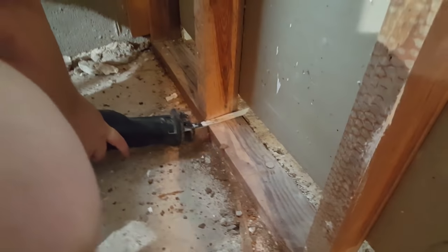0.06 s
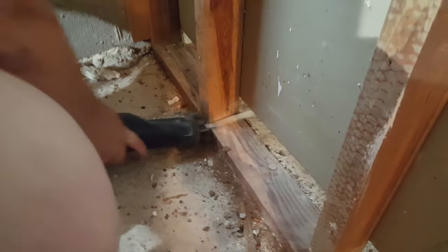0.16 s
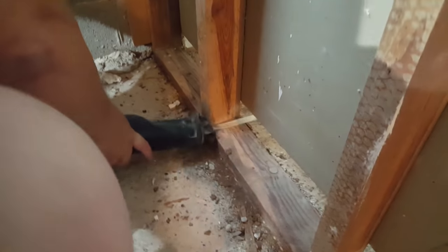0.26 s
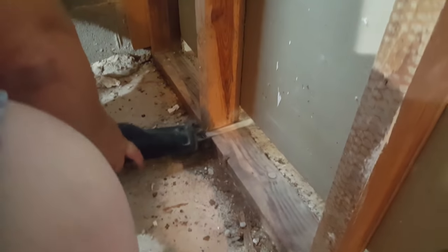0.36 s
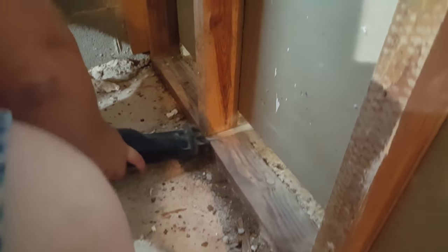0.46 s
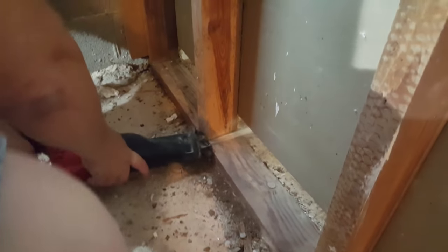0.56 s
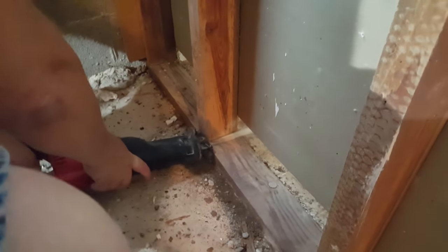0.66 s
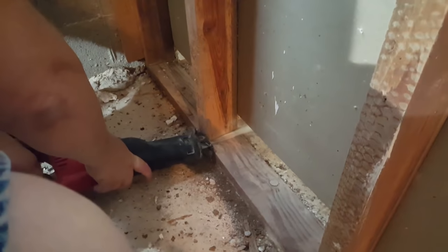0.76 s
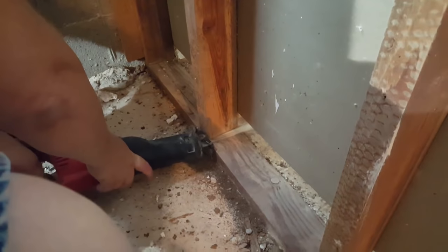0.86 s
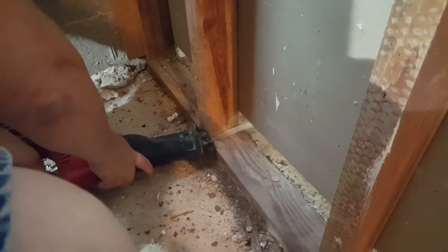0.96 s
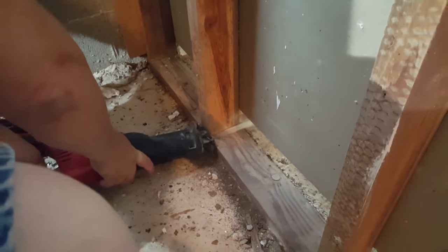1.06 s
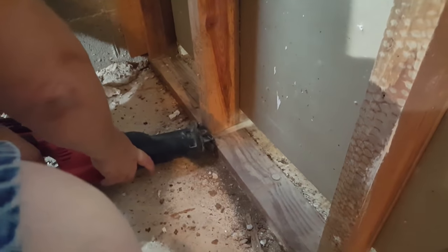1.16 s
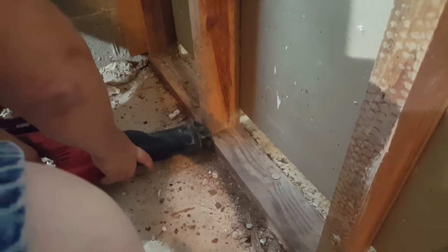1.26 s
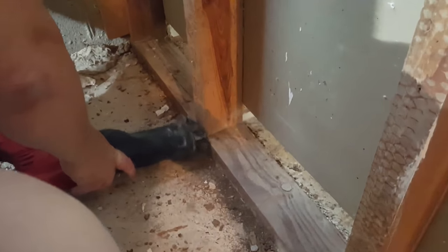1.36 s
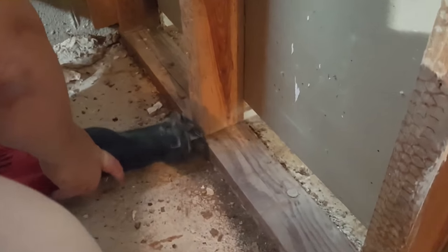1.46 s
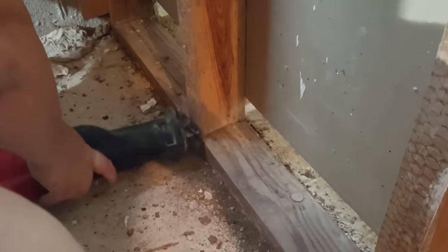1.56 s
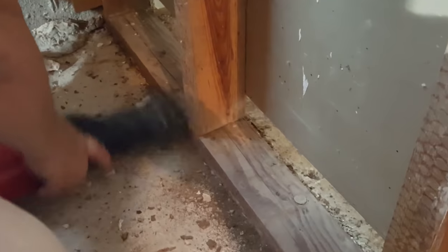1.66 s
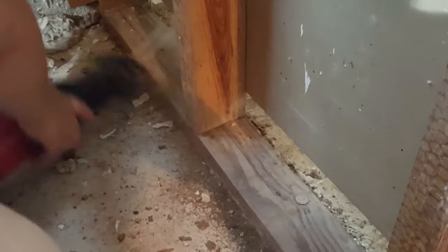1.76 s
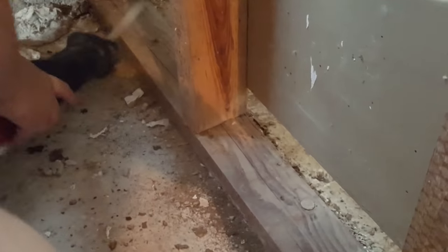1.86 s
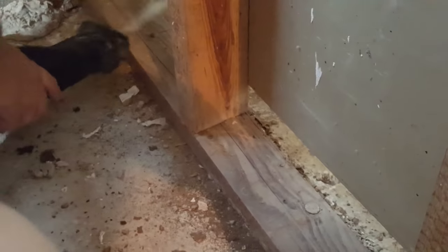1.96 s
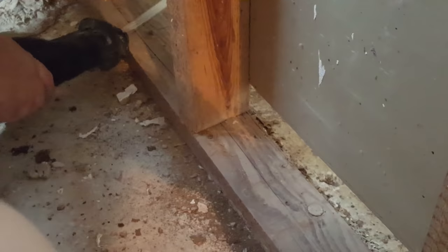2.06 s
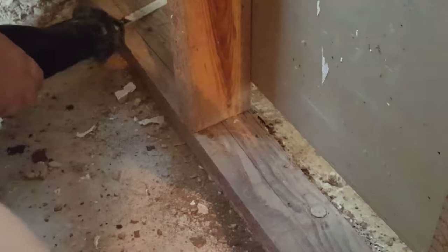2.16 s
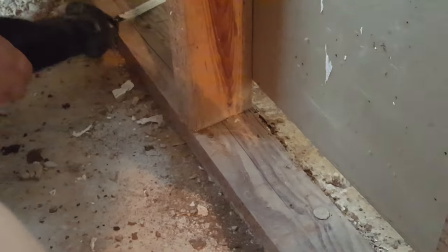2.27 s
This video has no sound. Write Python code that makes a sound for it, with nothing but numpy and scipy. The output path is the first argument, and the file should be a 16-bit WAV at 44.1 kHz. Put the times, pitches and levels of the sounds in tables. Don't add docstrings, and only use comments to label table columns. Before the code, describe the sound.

A reciprocating saw, close up in a bare reverberant room. Low handling rumble and hiss, a plastic trigger click near 0.08 s, then a quick motor run-up and brief squeal at 0.2-0.3 s. Loud gritty rasping on steel hammers about 45 strokes per second, with frame shudder and knocks, rougher thuds around 1.3-1.6 s. A sharp crack at 1.84, free whirr from 1.9, stopping about 2.15.

```python
import sys
import numpy as np
from scipy import signal
from scipy.fft import rfft, irfft
from scipy.io import wavfile

SR = 44100
rng = np.random.default_rng(int(sys.argv[2]) if len(sys.argv) > 2 else 0)


def transcribe(signal):
    frames = np.atleast_2d(signal).T
    limited = np.clip(frames, -1, 1)
    pcm = np.round(limited * 32767).astype(np.int16)
    wavfile.write(sys.argv[1], SR, pcm)


def volts_from_decibels(level):
    exponent = np.asarray(level, float) / 20
    return 10 ** exponent


N = 103635
FFT_SIZE = 2 ** 17
T = np.arange(N) / SR
HZ = np.fft.rfftfreq(FFT_SIZE, 1 / SR) + 1

# (time [s], rate [strokes/s])
STROKE_RATE = [(0.2, 30.6), (0.24, 37.2), (0.28, 43.2), (0.3, 47.0), (0.4, 47.6), (0.48, 46.7),
               (1.11, 46.3), (1.25, 46.6), (1.34, 46.2), (1.5, 44.2), (1.82, 44.2), (1.9, 44.6),
               (2.03, 44.6), (2.35, 46.1)]
# (time [s], rasp level [dB], frame shake level [dB], stroke depth [0-1])
CUT = [(0.25, -59, -68, 1), (0.29, -15.5, -12, 0), (0.36, -21.5, -20, 0.5), (0.45, -14.5, -18.5, 0.54),
       (0.6, -17, -17.5, 0.3), (0.75, -15.5, -19.5, 0.05), (1.05, -18, -22, 0.84), (1.2, -13, -23.5, 0.2),
       (1.31, -14.5, -21, 0.34), (1.55, -14, -24.5, 0.42), (1.62, -18, -20, 0.1),
       (1.76, -24.5, -24.5, 0.04), (1.81, -23, -28, 0.1), (1.95, -82, -66, 1)]
# (frequency [Hz], density [dB/Hz])
RASP_COLOUR = [(120, -24.5), (200, -7.5), (311, -16), (635, -4.5), (696, -3.5), (1650, -3), (2750, -16.5),
               (4120, -12.5), (16000, -39)]
# (frequency [Hz], width [Hz], lift [dB])
WOOD_MODES = [(645, 61, 5.5), (1000, 13, 3.5), (1347, 91, 5.5), (1654, 65, 5.5), (2300, 390, 5.5),
              (3840, 250, -0.5), (5600, 730, -13)]
# (frequency [Hz], density [dB/Hz])
CRACK_COLOUR = [(150, -42), (1000, 8), (4300, 8), (8000, 2.5), (16000, -12)]
# (time [s], peak level [dB])
KNOCKS = [(0.2881, -5.5), (0.3353, -12), (0.3554, -11.5), (0.3886, -26), (0.4022, -6.5), (0.449, -18),
          (0.4713, -28), (0.515, -5), (0.5373, -19), (0.557, -8), (0.5796, -21), (0.641, -16.5),
          (0.6844, -7.5), (0.7118, -15), (0.751, -23), (0.814, -14), (0.8366, -15), (0.856, -28),
          (0.8775, -14), (0.9199, -34), (0.9847, -29), (1.007, -12), (1.0266, -27), (1.0493, -15),
          (1.07, -13), (1.2087, -21), (1.317, -9.5), (1.3294, -23), (1.349, -6.5), (1.4496, -11),
          (1.503, -24), (1.541, -14), (1.584, -9.5), (1.6512, -13.5), (1.7874, -20)]
# (time [s], peak level [dB])
SNAGS = [
    (.427, -13),
    (.493, -19),
    (1.5533, -19),
    (1.5964, -14),
    (1.8385, -5),
    (1.8564, -21),
    (1.913, -14),
    (2.0936, -16),
]
# (time [s], level [dB], pitch [Hz])
BUCKS = [(0.289, -8.5, 286), (0.292, -9.5, 165.4), (0.326, -9.5, 160), (.355, -17, 153), (0.396, -13, 174),
         (.715, -10.5, 682), (0.357, -5.5, 750), (0.43, -4.5, 1322), (0.47, -12.5, 374), (1.315, -7, 1260),
         (1.33, -6.5, 1416), (1.374, -7, 1990), (1.463, -12.5, 2080), (1.548, -17, 2210), (1.838, -16, 960),
         (1.369, -7.5, 993), (1.414, -10, 1000), (1.46, -9.5, 907), (1.504, -9, 1058), (1.548, -9.5, 800),
         (1.596, -11, 1302), (1.695, -16, 190), (1.755, -19, 184)]
# (time [s], level [dB])
BLADE_RING = [(1.36, -60), (1.42, -27), (1.58, -25), (1.63, -60)]
# (time [s], locked share [0-1])
LOCK = [(0.3, 0.29), (0.7, 0.91), (1.2, 0.73), (1.4, 0.45), (1.7, 0.27)]
# (multiple of stroke rate, level [dB], strongest moment [s], span [s])
SHAKE_OVERTONES = [(1, -4.5, 1.13, 0.55), (2, -2.5, 1.08, 0.33), (3, -5.5, 0.98, 0.21), (4, 1, 1.084, 0.31),
                   (4, 2, 1.62, 0.065), (5, 0.5, 0.815, 0.12), (6, 0, 1.085, 0.29), (8, -4, .8, 0.14),
                   (9, 2.5, 1.084, 0.15), (10, -0.5, 0.99, 0.24), (11, -0.5, 0.93, .08),
                   (14, 4.5, 1.16, 0.21), (16, -0.5, 1.1, 0.097), (18, -0.5, 1.22, 0.088)]
# (frequency [Hz], density [dB/Hz])
FRAME_COLOUR = [(15, -31), (25, -38), (81, -13), (125, -5), (170, -4), (230, -9.5), (348, -9), (485, -21.5),
                (600, -11), (780, -44), (1320, -120)]
# (time [s], level [dB])
MOTOR_LEVEL = [(0.15, -78), (0.19, -45), (0.23, -30), (0.26, -17.5), (0.3, -18), (1.8, -22), (2.09, -22),
               (2.13, -32), (2.16, -45), (2.2, -58)]
# (frequency [Hz], density [dB/Hz])
WHIRR_COLOUR = [(59, -68), (100, -48), (266, -10), (315, -11.5), (350, -6), (930, -2.5), (2930, -13),
                (4400, -12), (5200, -14.5), (8800, -20.5), (16000, -27)]
# (frequency [Hz], width [Hz], lift [dB])
CASE_MODES = [(617, 27, 3.5), (954, 39, 4), (1850, 260, 8), (3260, 300, 3), (4066, 430, 3), (5900, 230, 2)]
# (time [s], level [dB])
WHISTLE = [(.12, -79), (.135, -55), (.17, -56), (.195, -51), (.23, -44), (.245, -70)]
# (time [s], level [dB])
SQUEAL = [(.2, -59), (.25, -24), (.29, -27), (.31, -60)]
# (time [s], peak level [dB], fall [dB/s])
TICKS = [
    (.0815, -25, 700),
    (.092, -35, 800),
    (.112, -42, 1400),
    (.188, -37, 900),
]
# (frequency [Hz], density [dB/Hz])
TICK_COLOUR = [(250, -23), (950, 0), (3500, -19), (6000, -11), (9400, -32), (12000, -22), (16000, -46)]
# (frequency [Hz], level [dB], T60 [s])
TRIGGER_MODES = [(500, -8, .1), (657, -8, .1), (921, -1, .12), (1222, -2, .05), (1346, -12, .12),
                 (1733, -1, .06), (1965, -12, .12)]
# (time [s], level [dB])
GRIT = [
    (.001, -46),
    (.147, -36),
    (2.203, -49),
    (2.243, -49),
    (2.288, -43),
]
# (time [s], level [dB])
SHUFFLE = [(0, -33), (.06, -34), (.13, -31.5), (.18, -35.5), (.4, -25), (2.1, -37), (2.35, -48)]
# (frequency [Hz], density [dB/Hz])
RUMBLE_COLOUR = [(18, -53), (30, -18), (125, 0.5), (240, -5.5), (276, -11), (462, -19), (2110, -47),
                 (8000, -80), (10400, -101), (17600, -120)]
# (frequency [Hz], density [dB/Hz])
HISS_COLOUR = [(180, -44), (300, -2), (1540, -9), (2500, -17.5), (8500, -32), (9500, -38), (15500, -33)]
# (frequency [Hz], shared power [0-1])
LIKENESS = [(60, 0.96), (180, 1), (350, 0.85), (700, 0.84), (1400, 0.15), (12000, 0.04)]
# (frequency [Hz], left over right [dB])
LEAN = [(60, -1), (240, -1), (950, 1.0), (3770, -0.5), (15000, -2.6)]
# (frequency [Hz], level [dB])
MICROPHONE = [(25, -14), (45, 0), (7000, 0), (9000, -1.5), (10100, -10.5), (11500, -3.5), (15500, -4)]


def rms_one(x):
    return x / np.sqrt(np.mean(x ** 2) + 1e-20)


def in_time(rows):
    s, *columns = np.transpose(rows)
    return [np.interp(T, s, column) for column in columns]


def at_hz(points):
    hz, values = np.transpose(points)
    return np.interp(np.log(HZ), np.log(hz), values)


def drift(rate_hz):
    r = np.exp(-2 * np.pi * rate_hz / SR)
    settle = 9000
    wander = signal.lfilter([1], [1, -2 * r, r * r], rng.standard_normal(N + settle))
    return rms_one(wander[settle:])


def body(force, spectrum, peaks=()):
    db = at_hz(spectrum)
    for hz, wide, lift_db in peaks:
        db = db + lift_db / (1 + (2 * (HZ - hz) / wide) ** 2)
    cepstrum = irfft(db * np.log(10) / 20)
    cepstrum[1:len(HZ) - 1] *= 2
    cepstrum[len(HZ):] = 0
    response = rfft(cepstrum)
    colour = rms_one(np.exp(response.real)) * np.exp(1j * response.imag)
    alike = at_hz(LIKENESS)
    lean = volts_from_decibels(at_hz(LEAN) / 2)
    noise = rfft(force * rng.standard_normal((2, N)), FFT_SIZE)
    mid, side = noise * colour * np.sqrt([(1 + alike) / 2, (1 - alike) / 2])
    return irfft([(mid + side) * lean, (mid - side) / lean])[:, :N]


def hits(rows, fall_db_per_s):
    force = np.zeros(N)
    for (s, db), fall in zip(rows, np.broadcast_to(fall_db_per_s, len(rows))):
        force += volts_from_decibels(np.where(T >= s, db - fall * (T - s), -200))
    return force


def strokes():
    turns = np.cumsum(in_time(STROKE_RATE)[0]) / SR
    knock_s = 0.985
    return turns - turns[int(knock_s * SR)]


def rasp(turns):
    db, _, depth = in_time(CUT)
    unevenness = np.clip(rng.normal(0, 1, 200), -1.5, 1.5)
    each_stroke = unevenness[np.floor(turns).astype(int) + 60]
    stroke_knock = depth * volts_from_decibels(1.2 * each_stroke) * np.exp(-(turns % 1) / 0.17)
    grain = volts_from_decibels(2.2 * drift(260) + 2.5 * drift(1200) + drift(30))

    lift_s, lift_share = 0.010, 0.85
    bite = np.ones(N)
    for s, _, hz in BUCKS:
        if hz > 600:
            bite *= 1 - lift_share * np.exp(-((T - s + lift_s) / lift_s) ** 2)

    blows = hits(KNOCKS, 1500)
    tooth_force = volts_from_decibels(db) * bite * rms_one(grain * (1 + 1.83 * stroke_knock))
    scrape = body(tooth_force + 0.59 * blows, RASP_COLOUR, WOOD_MODES)
    crack_force = volts_from_decibels(-5) * hits(SNAGS, 1300) + volts_from_decibels(-8) * blows + volts_from_decibels(db + 1.5) * stroke_knock
    return scrape + body(crack_force, CRACK_COLOUR, [(5650, 990, -7)])


def bucks():
    decay_cycles, hold_s, roughness, sag_per_s = 3.34, 0.025, 0.7, 7
    t = np.arange(SR // 8) / SR
    out = np.zeros((2, N))
    for s, db, hz in BUCKS:
        noise = rng.standard_normal((2, 2, len(t)))
        noise = noise + noise[:, ::-1] * np.clip(450 / hz, 0, 1)
        r = volts_from_decibels(-60 * hz / decay_cycles / SR)
        rough = (noise[0] + 1j * noise[1]) / np.sqrt(1 - r)
        push = np.exp(-(t / hold_s) ** 4) * (1 + roughness * rough)
        swing = signal.lfilter([1], [1, -2 * r, r * r], push)
        bend = 1 + min(hz / 1000, 1) * (0.1 - sag_per_s * t / 2)
        start_cycles = rng.random((2, 1)) * hz / 2000
        ring = (swing * np.exp(2j * np.pi * (hz * t * bend + start_cycles))).imag
        start = int(s * SR)
        out[:, start:start + len(t)] += volts_from_decibels(db) * ring / np.abs(ring).max()
    return out


def blade_ring():
    level = volts_from_decibels(in_time(BLADE_RING)[0] + 2.5 * drift(15)) * (T > 1.3) * (T < 1.7)
    return level * np.sin(2 * np.pi * 740 * T + 0.5 * drift(6))


def shake(turns):
    lock = in_time(LOCK)[0]
    swell_db = 14
    overtones = np.zeros(N)
    for k, db, s, span in SHAKE_OVERTONES:
        level = volts_from_decibels(db + swell_db * np.exp(-((T - s) / span) ** 2) + drift(1.2))
        phase = 2 * np.pi * k * (turns + 0.1315) + 0.25 * k * k + 0.41 * drift(2.1)
        overtones += level * np.cos(phase)
    firm = np.sqrt(lock) * rms_one(overtones)
    loose = np.sqrt(1 - lock) * body(volts_from_decibels(1.5 * drift(16.7)), FRAME_COLOUR)
    return volts_from_decibels(in_time(CUT)[1]) * (firm + loose)


def motor(turns):
    throb_db = 1.1 * np.cos(4 * np.pi * turns)
    force = volts_from_decibels(in_time(MOTOR_LEVEL)[0] + throb_db + 1.7 * drift(200))
    return body(force, WHIRR_COLOUR, CASE_MODES)


def control_whistle():
    return volts_from_decibels(in_time(WHISTLE)[0]) * (T < 0.3) * np.sin(2 * np.pi * 7779 * T)


def blade_squeal():
    force = volts_from_decibels(in_time(SQUEAL)[0]) * (T > 0.19) * (T < 0.4)
    squeal = body(force, [(20, -40), (20000, -40)], [(6100, 1300, 25)])
    chirp = volts_from_decibels(-17) * np.exp(-((T - 0.267) / 0.009) ** 2) * np.sin(2 * np.pi * 1285 * T)
    return squeal + chirp


def ticks():
    rings = np.zeros(N)
    for s, db, _ in TICKS:
        for hz, mode_db, t60 in TRIGGER_MODES:
            ring_db = db - 5.5 + mode_db - 60 * (T - s) / t60
            rings += volts_from_decibels(np.where(T >= s, ring_db, -200)) * np.sin(2 * np.pi * hz * (T - s))
    rows = np.array(TICKS)
    clicks = body(hits(rows[:, :2], rows[:, 2]), TICK_COLOUR)
    return rings + clicks + body(hits(GRIT, 1500), CRACK_COLOUR)


def room(x):
    t60_s, level_db, dull_hz, thin_hz = 0.47, -5, 4530, 300
    t = T[:SR // 2]
    tail = rng.standard_normal((2, len(t))) * volts_from_decibels(-60 * t / t60_s) * (t > 0.006)
    tail = tail / np.sqrt(np.sum(tail ** 2, axis=1, keepdims=True))
    wet = rfft(x, FFT_SIZE) * rfft(tail, FFT_SIZE)
    wet = wet / (1 + 1j * HZ / dull_hz) ** 2 / (1 + (thin_hz / HZ) ** 2)
    return volts_from_decibels(level_db) * irfft(wet)[:, :N]


def background():
    rumble = body(volts_from_decibels(in_time(SHUFFLE)[0] + 0.96 * drift(15)), RUMBLE_COLOUR)
    return rumble + body(np.full(N, volts_from_decibels(-48.5)), HISS_COLOUR)


def scene():
    turns = strokes()
    cutting = rasp(turns) + bucks() + blade_ring() + shake(turns)
    machine = motor(turns) + control_whistle() + blade_squeal() + ticks()
    near = cutting + machine
    return near + room(near) + background()


def band_limit(x):
    return signal.sosfilt(signal.butter(12, 16890, fs=SR, output="sos"), x)


def record(dry):
    rounded = 1.567 * np.tanh(dry / 1.632)
    heard = rfft(rounded, FFT_SIZE) * volts_from_decibels(at_hz(MICROPHONE)) * (HZ < 15950)
    mix = np.clip(irfft(heard)[:, :N], -0.97, 0.97)
    return band_limit(mix)


dry = scene()
out = record(dry)
transcribe(out)
```